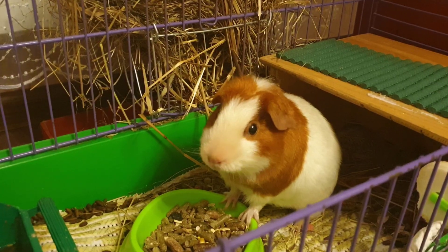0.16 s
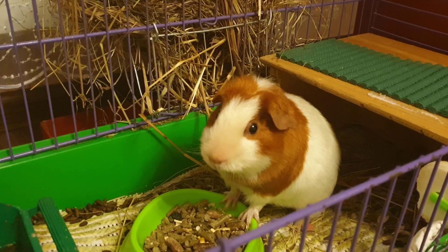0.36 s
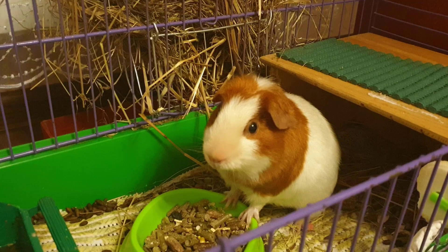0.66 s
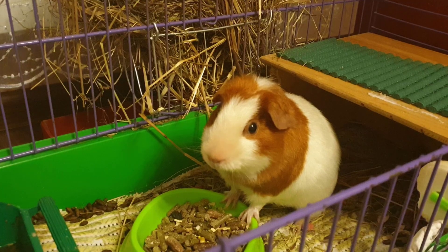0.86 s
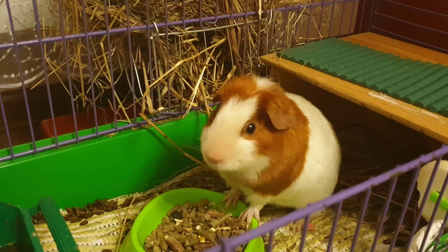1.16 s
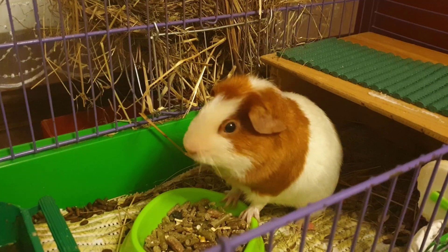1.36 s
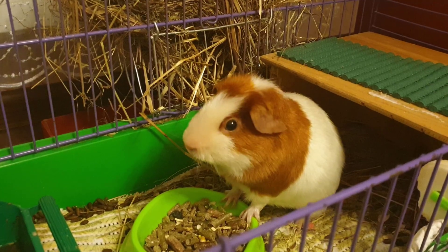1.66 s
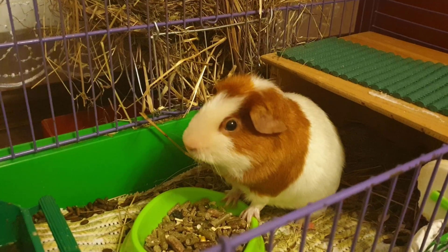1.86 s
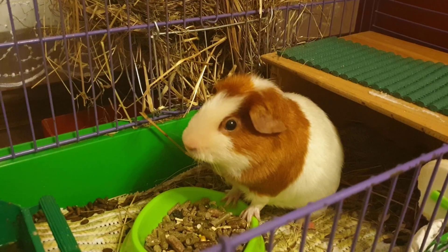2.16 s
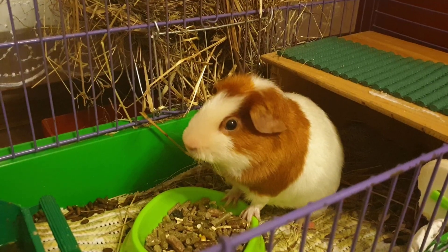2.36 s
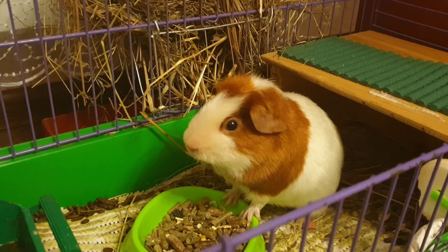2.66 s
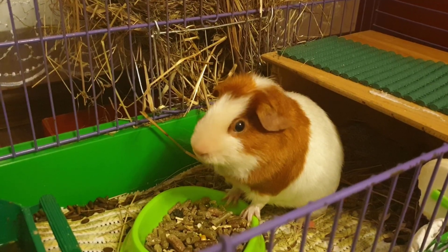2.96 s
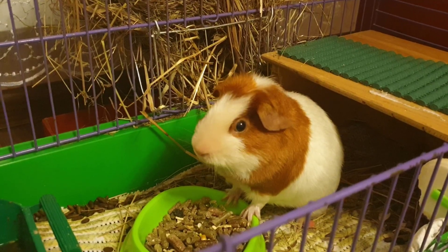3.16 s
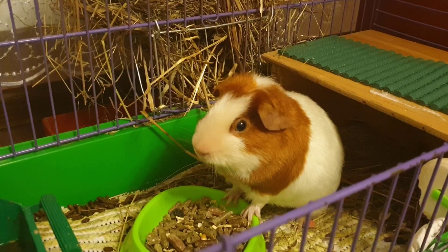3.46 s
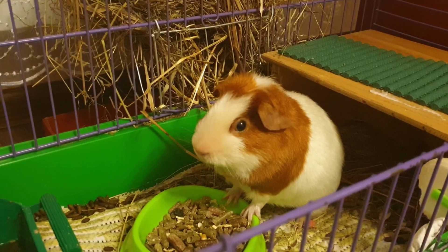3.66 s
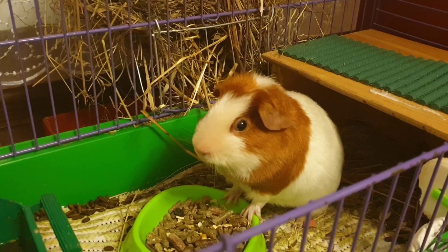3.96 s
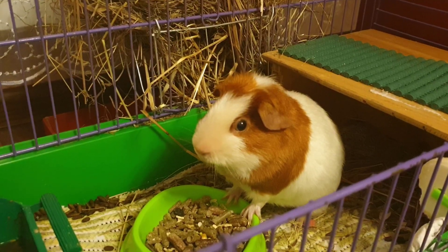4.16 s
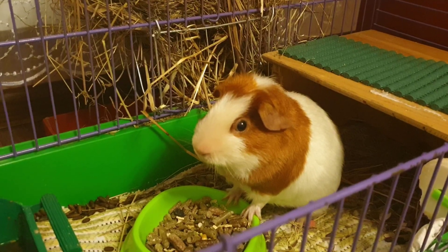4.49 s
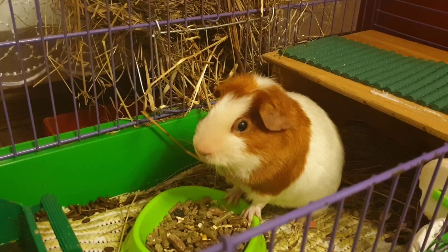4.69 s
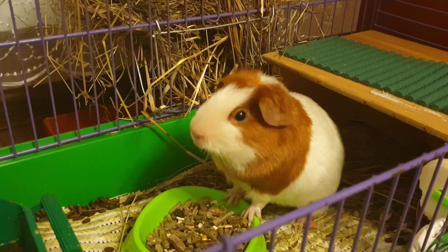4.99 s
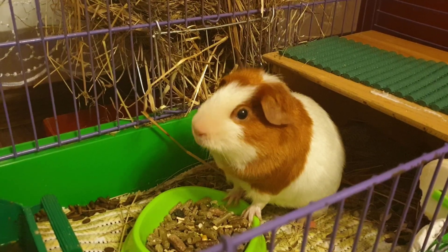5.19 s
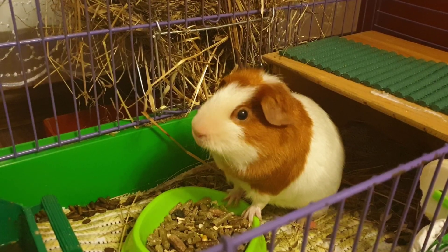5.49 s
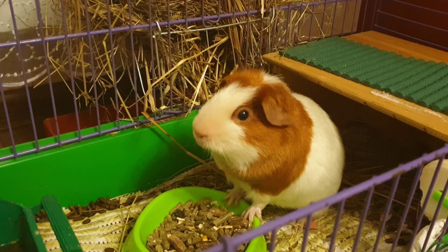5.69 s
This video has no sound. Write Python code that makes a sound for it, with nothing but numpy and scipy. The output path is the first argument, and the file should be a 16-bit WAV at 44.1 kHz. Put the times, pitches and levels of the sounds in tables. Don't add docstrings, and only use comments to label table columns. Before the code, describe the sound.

Starting at the loud, high crest of one squeal, a guinea pig in a wire cage whistles twelve more times, each a short hoot sweeping upward, some reaching a squeal. A thin plastic food bag crackles softly in uneven swells across the room. Near the end, a faint hollow bump. Close stereo microphones, short room reflections, low rumble and slight hiss.

```python
import sys
import numpy as np
from scipy import signal
from scipy.io import wavfile
from scipy.ndimage import uniform_filter1d

SR = 44100
rng = np.random.default_rng(int(sys.argv[2]) if len(sys.argv) > 2 else 0)


def wrap_up_sound(samples):
    columns = np.atleast_2d(samples).T
    tamed = np.clip(columns, -1, 1)
    steps = np.round(tamed * 32767).astype(np.int16)
    wavfile.write(sys.argv[1], SR, steps)


def ratio(d):
    e = np.asarray(d, float) / 20
    return 10 ** e


N = 257400

# [t/s, pitch f/Hz]
CREST = [
    (-.016, 1600),
    (.006, 1796),
    (.039, 2749),
    (.057, 3057),
    (.093, 3368),
    (.123, 3547),
    (.154, 3575),
]
# [start t/s, first f/Hz, settled f/Hz, bend t/s, bend f/Hz]
HOOTS = [(.296, 625, 588, .387, 605), (.669, 680, 612, .795, 605), (1.153, 620, 583, 1.268, 599),
         (1.941, 465, 508, 2.044, 550), (2.426, 512, 562, 2.55, 625), (2.978, 640, 598, 3.067, 590),
         (3.473, 560, 572, 3.54, 590), (3.899, 525, 530, 3.958, 570), (4.275, 545, 578, 4.424, 618),
         (4.748, 552, 585, 4.869, 619), (5.27, 625, 585, 5.365, 606), (5.674, 570, 585, 5.752, 605)]
STEPS_HZ = [750, 1000, 1300, 1750]
# [t/s, t/s, t/s, t/s]
SWEEPS = [(.413, .437, .477, .513), (.818, .841, .866, .903), (1.298, 1.336, 1.359, 1.396),
          (2.122, 2.148, 2.184, 0), (2.578, 2.654, 2.675, 2.74), (3.107, 3.134, 3.198, 3.211),
          (3.57, 3.583, 0, 0), (3.982, 3.998, 0, 0), (4.444, 4.466, 4.498, 0), (4.891, 4.92, 4.966, 4.983),
          (5.399, 5.416, 5.43, 5.446), (5.788, 5.811, 0, 0)]
# [catch t/s, catch f/Hz, end t/s, last f/Hz, share of the last pitch shortly before]
ENDINGS = [(.442, 1075, .559, 2850, .73), (.94, 2815, .992, 3170, .955), (1.433, 2601, 1.479, 3110, .91),
           (2.095, 715, 2.216, 1770, .76), (2.722, 1430, 2.812, 3160, .93), (3.187, 1141, 3.26, 2235, .96),
           (3.597, 1215, 3.665, 1210, .915), (4.011, 1190, 4.063, 1250, .975),
           (4.48, 1168, 4.544, 1740, .81), (5.025, 2293, 5.089, 3150, .935),
           (5.461, 2015, 5.515, 2420, .862), (5.768, 642, 5.843, 1420, .715)]
# [t/s, f/Hz]
CATCHES = [
    (.757, 597),
    (2.171, 1110),
    (2.587, 795),
    (2.64, 885),
    (2.681, 1335),
    (2.708, 1365),
    (3.082, 629),
    (4.938, 1076),
    (5.035, 2570),
    (5.472, 2060),
]
# [hoot level/dB, sweep level/dB, squeal level/dB, last pitch level/dB]
EFFORT_DB = [(-33, -25.5, -32, -28), (-32.5, -39.5, -39, -39), (-33, -40, -34.5, -31.5),
             (-32, -38.5, -36, -31), (-36, -41, -41.5, -40), (-36, -42.5, -39, -31), (-34, -40, -42, -46),
             (-36, -45, -40, -40), (-36.5, -45, -47, -40), (-37, -42.5, -35.5, -40),
             (-34, -39.5, -38, -29.5), (-35, -42, -34, -78), (-36, -40, -38, -40)]
# [hoot level/dB, sweep level/dB, squeal level/dB]
OVERTONES_DB = [(0, -12, -4), (-3, -1, 4), (-3.5, 0, -10.5), (-4.5, -2, 1.5), (-1, -2, -11), (-2, -3, -6),
                (3.5, -5.5, 12), (0.5, 1, 0), (-0.5, -10, 0), (4, 6, -12), (4, -5, -14), (4, 5, -4),
                (5.5, -9, 0)]
THIRD_DB = [0, 18, 8, 17, 0, 0, 2, 0, 0, 0, 0, 0, 0]
# [t/s, extra
# level/dB]
CREST_PUSH = [(0.0, 5), (.04, 1), (.065, 0.5), (.1, 0.5), (.13, 3.5), (.15, 3), (.2, 2)]
# [pitch f/Hz, level/dB]
REGISTER_BREAK = [(640, -0.5), (720, 0), (850, -2), (1350, -1), (1500, -1), (1800, -2)]
# [pitch f/Hz, level/dB]
SECOND = [(600, -17.5), (800, -14.5), (1100, -13.5), (1400, -5.5), (1800, -25), (2500, -10), (3000, -1.5),
          (3500, -10)]
HARMONIC_DB = [0., -12., -12., -24., -30.]
# [pitch f/Hz, level/dB]
RICHNESS = [(600, -6), (800, -1), (1000, -2), (1400, 5), (2200, 0), (2900, -14), (3250, 1), (3500, 2)]
# [f/Hz, level/dB]
PATH = [(491, -11), (589, -14.5), (676, -24.5), (800, -12), (1021, -2), (1227, -1), (1543, -19.5),
        (2030, -14.5), (2300, -13.5), (2800, -17), (3050, -9), (3250, -4), (3600, -11)]
# [f/Hz, level/dB]
MOUTH = [(3600, .0), (4100, -8), (4700, -20), (5400, -6), (6000, -2), (6500, -4), (7000, -5), (8200, -14),
         (9300, -6), (10600, 3), (12000, -6), (13500, 3), (15500, -5)]
# [f/Hz, left minus right level/dB]
LEFT_RIGHT = [(491, 6), (514, 3), (676, -4.5), (741, 9), (890, -1), (976, 15), (1069, 3), (1227, 0),
              (1284, -34), (1344, 4), (1543, -1)]
# [f/Hz, t/s]
ROOM_T60 = [(500, 0.6), (1200, 0.38), (3000, 0.57), (8000, 0.078)]
# [f/Hz, level/dB]
ROOM_SEND = [(500, -8), (800, -4), (1200, -3.5), (1600, -1), (2300, -3), (3000, -5), (4500, -4), (8000, -5)]
# [peak t/s, peak level/dB, swell t/s, fade t/s,
# body level/dB]
SQUEEZES = [(0.0, -61.5, .1, 0.21, 7), (.18, -58, 0.25, 0.18, -12), (.44, -58.5, 0.5, 1, -14),
            (0.661, -45.5, 0.47, 0.24, -3), (.85, -49.5, 0.38, 0.29, -1.5), (1.1, -52.5, 0.56, 0.32, -8.5),
            (1.441, -60.5, 0.45, 1, -7), (1.68, -53.5, 0.29, 0.39, -9.5), (2.04, -68, 0.85, 0.12, -22),
            (2.22, -75.5, 1, 0.15, 9), (2.5, -85, 0.83, 0.87, -4.5), (2.77, -79, 0.22, .5, 9),
            (3.04, -64.5, 0.31, 0.38, -5.5), (3.21, -73, 0.42, 0.11, -2), (3.43, -67, -0.4, 1, -30),
            (3.55, -57.5, 0.32, 1, -1), (3.67, -54, 0.35, 1, -3), (4.018, -48, 0.4, 0.52, -6),
            (4.24, -52, 0.15, 0.74, -5), (4.62, -53, 0.43, 0.5, -7.5), (5.14, -51, 0.47, 0.41, -0.5),
            (5.318, -47.5, .1, .3, -3), (5.72, -48.5, 0.8, 0.34, -2.5), (5.84, -50.5, 0.31, 0.17, 1.5)]
# [f/Hz, level/dB per Hz]
BAG = [(150, -19), (250, -18.5), (466, -11), (517, -8), (593, -7), (838, -6), (1310, -8.5), (1960, -3.5),
       (7150, 8.5), (7930, 1.5), (11000, 2.5), (15600, -8)]
# [f/Hz, likeness from -1 to 1]
LIKENESS = [(25, 1), (60, 0.79), (130, 0.81), (290, 0.67), (640, 0.058), (15000, 0.015)]
# [peak t/s, peak level/dB, swell t/s, fade t/s]
RUMBLE_SWELLS = [
    (0.0, -72, .5, 0.7),
    (.67, -68, .7, 0.5),
    (1.97, -74, 0.6, .8),
    (2.68, -69.5, 0.87, 0.21),
    (3.58, -68.5, 0.39, 1.6),
]
# [f/Hz, level/dB per Hz]
RUMBLE = [(20, -7.5), (41, -1), (59, 4), (89, -3), (119, -6), (208, -15.5), (330, -18), (500, -59)]
# [f/Hz, level/dB per Hz]
HISS = [(200, 9), (330, -16), (500, -1), (1100, 20), (4700, -28), (8000, -23), (11000, -11), (15000, 9)]
# [f/Hz, level/dB, 60 dB decay t/s]
KNOCK_MODES = [
    (742, -50, 0.14),
    (703, -56.5, 0.6),
    (815, -62, 0.094),
]
EDGES = 18 * 2 ** np.arange(0, 10.1, 1 / 3)
CENTRES = np.sqrt(EDGES[1:] * EDGES[:-1])


def rms_one(x):
    return x / np.sqrt(np.mean(x ** 2) + 1e-20)


def at_hz(points, hz):
    table_hz, value = np.array(points)[:, 0], np.array(points)[:, 1]
    return np.interp(np.log(hz), np.log(table_hz), value)


def drift(rate_hz):
    r = np.exp(-80 * np.pi * rate_hz / SR)
    white = rng.standard_normal(N // 40 + 2002)
    slow = signal.lfilter([1], [1, -2 * r, r * r], white)[2000:]
    return np.interp(np.arange(N) / 40, np.arange(len(slow)), rms_one(slow))


def band(x, k):
    return signal.sosfilt(signal.butter(2, EDGES[k:k + 2], "band", fs=SR, output="sos"), x)


def swells(rows):
    s, db, rise_s, fall_s = np.transpose(rows)[:4, :, None]
    late = np.arange(0, N + 64, 64) / SR - s
    away = np.where(late < 0, -late / np.abs(rise_s), late / np.abs(fall_s))
    return ratio(db - 20 * away * (.75 + away)) ** 2


def every_sample(coarse):
    return np.interp(np.arange(N) / 64, np.arange(len(coarse)), coarse)


def layered(white, spectrum, gain_db, patchy_db):
    out, power = 0, 0
    for k, hz in enumerate(CENTRES):
        if not spectrum[0][0] <= hz <= 1.2 * spectrum[-1][0]:
            continue
        mid, side = band(white[k % 2], k) * ratio(at_hz(spectrum, hz))
        alike = np.clip(at_hz(LIKENESS, hz), -1, 1)
        pair = np.sqrt(1 + alike) * mid + np.sqrt(1 - alike) * side * [[1], [-1]]
        power += np.mean(pair ** 2)
        out = out + pair * ratio(gain_db(hz) + patchy_db * drift(7.3))
    return out / np.sqrt(power)


def melodies():
    out = [CREST]
    for hoot_row, passes, ending in zip(HOOTS, SWEEPS, ENDINGS):
        start, first, settled, bend, bend_hz = hoot_row
        catch, catch_hz, end, last, share = ending
        settled_s = start + .45 * (bend - start)
        hoot = [(start, first), (settled_s, settled), (bend, bend_hz)]
        sweep = [(s, hz) for s, hz in zip(passes, STEPS_HZ) if s > 0]
        catches = [(s, hz) for s, hz in CATCHES if start < s < end]
        close = [(catch, catch_hz), (end - .03, share * last), (end, last)]
        out.append(sorted(hoot + sweep + catches + close))
    return out


def whistle_effort(t, start, end, pitch, last_hz, calls_db, waver):
    hoot_db, sweep_db, squeal_db, crest_db = calls_db
    effort_db = at_hz([(514, hoot_db), (926, sweep_db), (2220, squeal_db),
                       (max(1.08 * 2220, last_hz), crest_db)], pitch)
    effort_db += -5.5 * np.clip(1 - (t - start - .016) / 0.043, 0, 1)
    effort_db += -2.5 * np.clip(1 - (end - t) / 0.027, 0, 1)
    effort_db += at_hz(REGISTER_BREAK, pitch)
    effort_db += 1.8 * waver * at_hz([(700, 0.26), (1300, 1)], pitch)
    return effort_db + np.interp(t, *np.transpose(CREST_PUSH))


def whistles(delay_s, side, flutter):
    out = np.zeros(N)
    slow = uniform_filter1d(flutter - 1, size=700)
    waver = np.roll(rms_one(uniform_filter1d(flutter - 1, size=300)), SR)
    flicker_db = 4 * rms_one(slow)
    for melody, calls_db, overtones_db, third_db in zip(melodies(), EFFORT_DB, OVERTONES_DB, THIRD_DB):
        s, notes = np.transpose(melody)
        start, end = s[0], s[-1]
        at = np.arange(max(int(start * SR), 0), min(int(end * SR), N))
        glide = np.exp(np.interp(at / SR, s, np.log(notes)))
        pitch = uniform_filter1d(glide, size=180, mode="nearest")
        t = at / SR - delay_s
        turns = 2 * np.pi * np.cumsum(pitch) / SR
        phase = np.interp(t, at / SR, turns, left=-2 * np.pi * pitch[0] * delay_s)
        attack_s, release_s = .016, .007
        edges = np.clip((t - start) / attack_s, 0, 1) ** 2 * np.clip((end - t) / release_s, 0, 1)
        effort_db = whistle_effort(t, start, end, pitch, notes[-1], calls_db, waver[at])
        extra_db = at_hz(list(zip([700, 1100, 2600], overtones_db)), pitch)
        extra_db += flicker_db[at] * at_hz([(680, 0), (900, 1)], pitch)
        for k in range(1, 7):
            hz = k * pitch
            source_db = 0
            if k > 1:
                source_db = at_hz(SECOND, pitch) + extra_db + HARMONIC_DB[k - 2]
            if k > 2:
                source_db = source_db + at_hz(RICHNESS, pitch)
            if k == 3:
                source_db = source_db + third_db * at_hz([(650, 1), (800, 0)], pitch)
            share = np.sqrt(2 / (1 + ratio(-2 * side * at_hz(LEFT_RIGHT, hz))))
            level = ratio(effort_db + source_db + at_hz(PATH, hz) + at_hz(MOUTH, hz)) * share
            out[at] += np.sqrt(2) * edges * level * np.sin(k * phase) * (hz < 16000)
    return out * flutter


def guinea_pig():
    lowpass = signal.butter(1, 250, fs=SR, output="sos")
    air = signal.sosfilt(lowpass, rng.standard_normal(N))
    flutter = 1 + ratio(-23.0) * rms_one(air)
    right_lag_s = .000108
    return np.array([whistles(0, 1, flutter), whistles(right_lag_s, -1, flutter)])


def room(x):
    t = np.arange(SR // 2) / SR
    white = rng.standard_normal((2, len(t)))
    tail = 0
    for k in range(11, len(CENTRES)):
        t60 = at_hz(ROOM_T60, CENTRES[k])
        fall = ratio(at_hz(ROOM_SEND, CENTRES[k]) - 60 * t / t60)
        tail = tail + band(white, k) * fall / np.sqrt(t60 * SR / np.log(1e6))
    tail = tail * (1 - np.exp(-t / .009))
    return signal.fftconvolve(x, tail, axes=1)[:, :N]


def bag():
    power = swells(SQUEEZES)
    total = power.sum(axis=0)
    level_db = every_sample(10 * np.log10(total))
    body_db = every_sample(np.transpose(SQUEEZES)[4] @ power / total)
    size = ratio(4.0 * np.minimum(rng.exponential(1, (2, N)), 5))
    snaps = (rng.random((2, N)) < 3000 / SR) * size
    snaps = rms_one(snaps * rng.choice([-1, 1], (2, N)))
    white = 0.3 * snaps + rng.standard_normal((2, 2, N))

    def gain_db(hz):
        low = np.clip(np.log2(4000 / hz), 0, 1)
        high = np.clip(np.log2(hz / 6500) * 3, 0, 1)
        return level_db + 1.5 + low * (body_db + 13.5) + high * -.5

    crumple = layered(white, BAG, gain_db, patchy_db=1.0)
    return crumple * ratio(1.2 * drift(17) + [[-.4], [.4]])


def house():
    steady_db, hiss_db = -72, -90
    rumble_db = every_sample(10 * np.log10(swells(RUMBLE_SWELLS).sum(axis=0) + ratio(steady_db) ** 2))
    white = rng.standard_normal((2, 2, N))
    rumble = layered(white, RUMBLE, lambda hz: rumble_db, patchy_db=3.5)
    hiss = layered(white, HISS, lambda hz: hiss_db, patchy_db=.4)
    return rumble + hiss


def knock():
    t = np.maximum(np.arange(N) / SR - 5.108, 0)
    rings = sum(ratio(db - 60 * t / t60) * np.sin(2 * np.pi * hz * t) for hz, db, t60 in KNOCK_MODES)
    return rings * (1 - np.exp(-t / 0.0021))


def scene():
    near = guinea_pig() + knock()
    return near + room(near) + bag() + house()


def band_limit(x):
    return signal.sosfilt(signal.butter(12, 15710, fs=SR, output="sos"), x)


def record(dry):
    return band_limit(dry)


dry = scene()
out = record(dry)
wrap_up_sound(out)
```